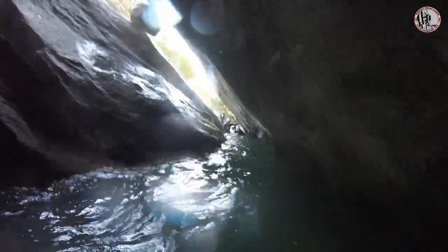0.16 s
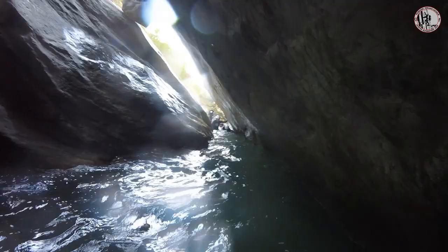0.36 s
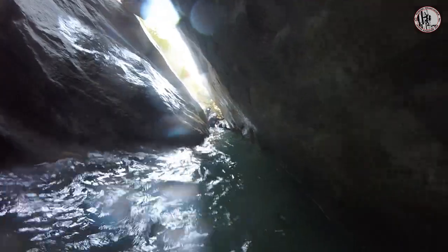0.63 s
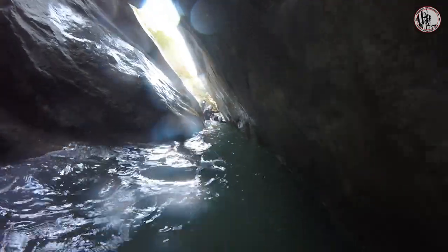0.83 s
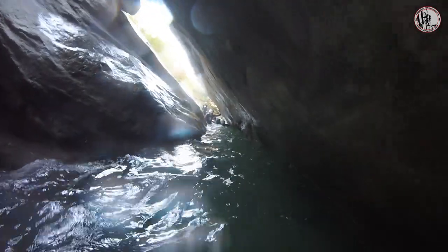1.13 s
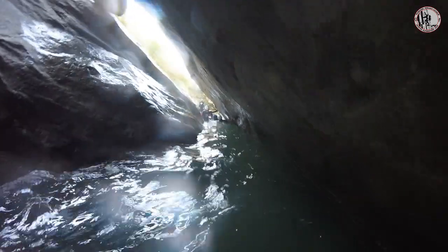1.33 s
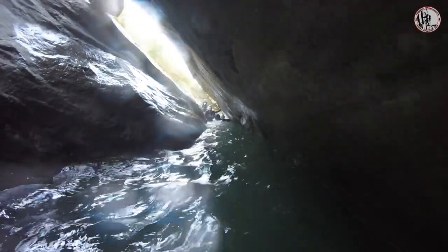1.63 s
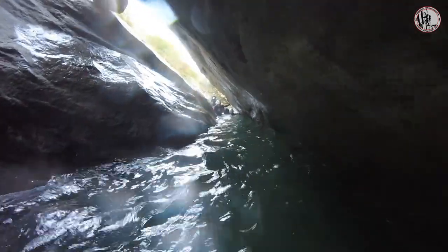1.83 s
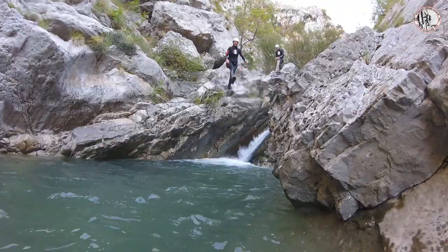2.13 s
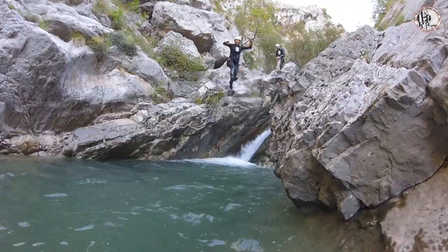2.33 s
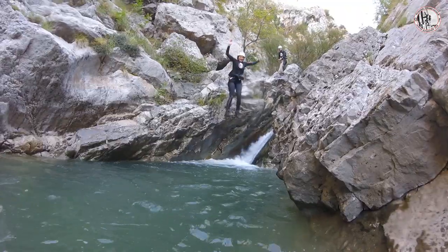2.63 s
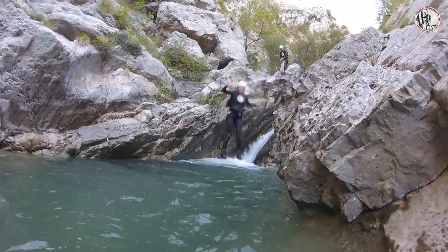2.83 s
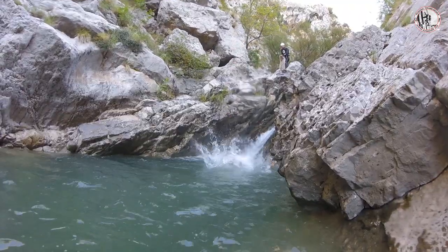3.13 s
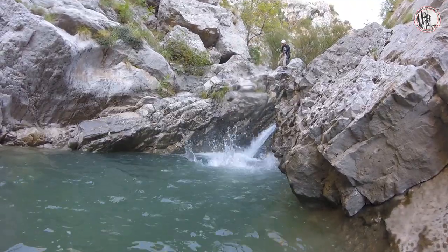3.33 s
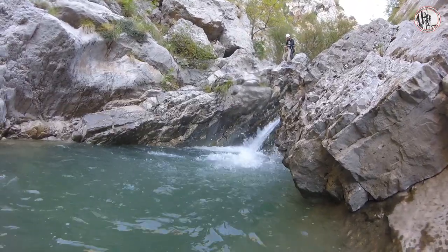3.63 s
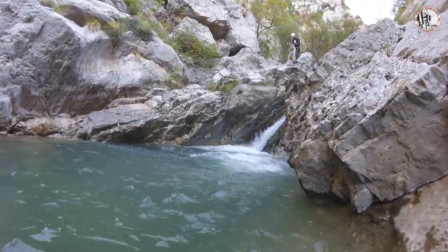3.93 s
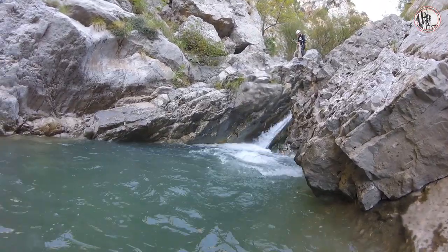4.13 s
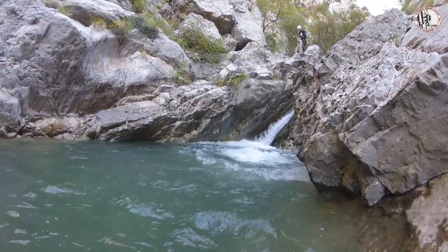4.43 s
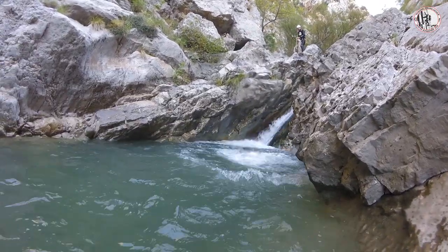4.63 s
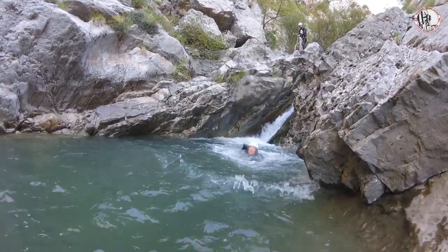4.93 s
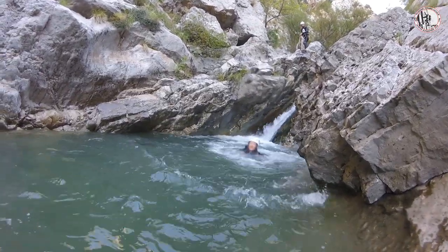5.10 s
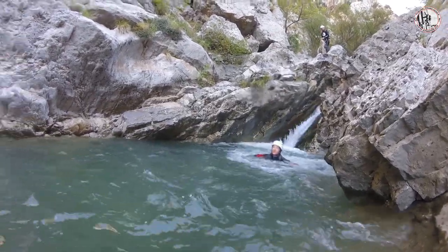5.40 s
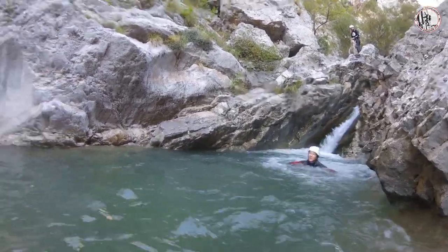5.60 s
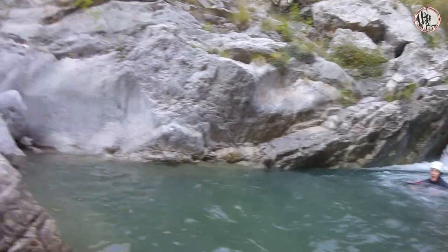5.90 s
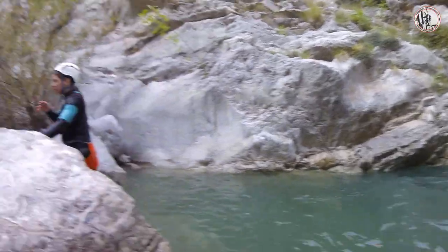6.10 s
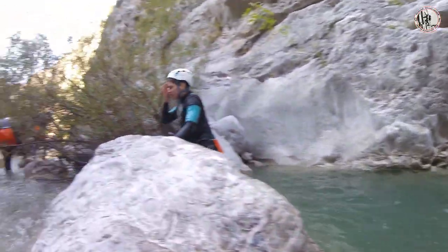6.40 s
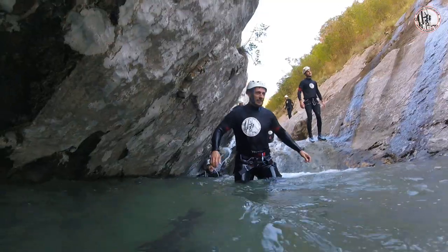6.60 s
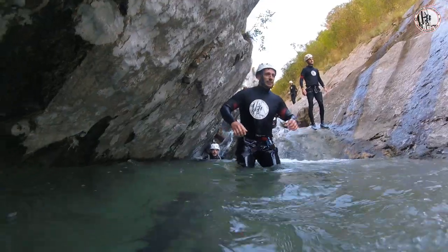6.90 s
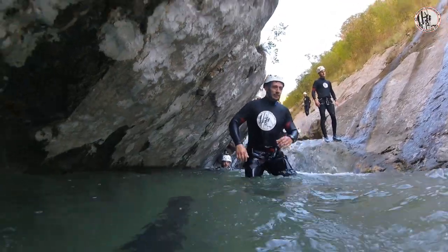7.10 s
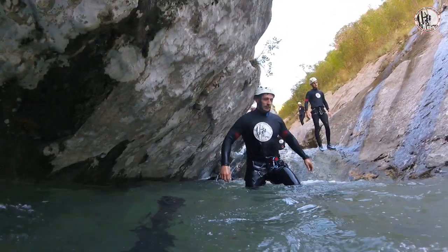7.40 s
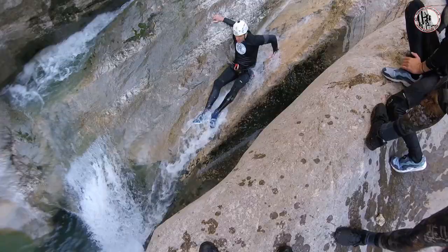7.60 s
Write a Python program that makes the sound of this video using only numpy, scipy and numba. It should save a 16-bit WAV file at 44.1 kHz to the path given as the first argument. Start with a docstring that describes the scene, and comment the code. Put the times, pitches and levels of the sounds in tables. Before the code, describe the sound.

A cascade roars in a narrow cave, bright hiss over a surging deep boom. It cuts abruptly to a lighter fall drumming into an open pool, where a body lands with quick slaps and a fading burst of spray. The fall slowly softens and dulls. After a short silence, water runs over shallows with a pitch-shifting hiss. A small wet camera housing colours everything and clicks under drops.

```python
"""Rushing water at three places in a rocky gorge, heard by a small camera in a wet waterproof housing.
A cascade hisses and booms in a narrow cave; a small fall pours into an open pool, where a jumper lands.
After a short silence water runs through shallows while a film on the microphone port shifts its whistle-like hiss.
Falling water is filtered turbulence, droplets and ringing bubbles; slaps throw up decaying bursts of spray.
Drops knock on the housing as short rings with a tick, and the gain ducks ahead of the loudest hits."""
import sys
import numpy as np
from scipy import signal
from scipy.fft import rfft, irfft, next_fast_len
from scipy.io import wavfile
from scipy.ndimage import uniform_filter1d, minimum_filter1d
from numba import njit

SR = 44100
rng = np.random.default_rng(int(sys.argv[2]) if len(sys.argv) > 2 else 0)


def unload_audio(sound):
    """Save the sound as a 16-bit wav file, at the path given as the first command line argument."""
    columns = np.transpose(np.atleast_2d(sound))
    # keep every value between -1 and 1, then stretch to whole-number steps
    steps = np.round(np.clip(columns, -1, 1) * 32767)
    wavfile.write(sys.argv[1], SR, steps.astype(np.int16))


N = 341762
T = np.arange(N) / SR  # time in seconds
CAVE_END_S, POOL_END_S, SHALLOWS_START_S = 2.089, 6.626, 6.868


# Relative spectrum of the cascade's hiss: pitch_hz, level_db
CAVE_RUSH_SPECTRUM = [(100, -6), (250, 5.5), (500, 3.5), (850, 2.5), (1400, 0), (2500, -1.5), (4000, -2),
                      (5300, 1), (6500, -4.5), (9500, -4)]
# Relative spectrum of the boom under it: pitch_hz, level_db
CAVE_BOOM_SPECTRUM = [(6, -30.5), (22, 0), (38, -2.5), (60, 2), (90, -1.5), (130, -5.5), (170, -11),
                      (260, -13), (400, -22), (900, -46)]
# Level of the hiss in the cave: time_s, level_db
CAVE_HISS_LEVEL = [(0, -21.5), (.8, -20), (1.4, -20.5), (1.66, -23.5), (1.93, -21.5), (2.089, -22.5)]
# Heaviest surges of the boom: peak_s, rise_db
BOOM_SURGES = [(.16, 3), (.38, 3), (.63, 5.5), (1.12, 4.5), (1.4, 6), (1.54, 6.5), (1.66, 6.5)]
BOOM_DB, SURGE_S = -21, 0.048  # level between surges; half-width of a surge


def cave():
    """The cascade fills a narrow cave with hiss and a heavy, churning boom."""
    hiss = rush(CAVE_RUSH_SPECTRUM, spray_db=-7, bubble_db=-19.0, flicker_db=0.9, surge_db=0.08)
    hiss = housed(hiss)
    hiss_db, = curves(CAVE_HISS_LEVEL)
    boom = housed(colour(churn(flicker_db=1, surge_db=1, rate=30), CAVE_BOOM_SPECTRUM))
    boom_db = BOOM_DB + sum(rise_db * swell(peak_s, SURGE_S) for peak_s, rise_db in BOOM_SURGES)
    return undb(hiss_db) * hiss + undb(boom_db) * boom


# Relative spectrum of the fall's hiss: pitch_hz, level_db
POOL_RUSH_SPECTRUM = [(100, 1.5), (330, 0.5), (490, 5), (600, 8), (860, 7), (1150, 3.5), (2000, 0),
                      (3200, -3), (6500, 1), (9500, 0.5)]
# Relative spectrum of the drumming plunge: pitch_hz, level_db
POOL_PLUNGE_SPECTRUM = [(8, -32), (25, -12), (60, -3.5), (95, -6.5), (135, 3.5), (185, -3.5), (250, -1.5),
                        (340, -10.5), (420, -6.5), (490, -15), (1000, -33)]
FALL_DB, PLUNGE_DB = -26, -30  # levels at first
# the treble's sink comes on top of the fall's
FALL_SINK_DB_PER_S, TREBLE_SINK_DB_PER_S, PLUNGE_SINK_DB_PER_S = 0.86, 0.73, 0.94
# the air that the jumper drags under wells up and swells the plunge
WELLING_AT_S, WELLING_S, WELLING_DB = 3.354, 0.14, 5


def pool():
    """A small fall hisses into the pool and drums in the hollow under the rock, growing softer and duller."""
    age_s = np.maximum(T - CAVE_END_S, 0)
    hiss = housed(rush(POOL_RUSH_SPECTRUM, spray_db=-6.5, bubble_db=-18.5, flicker_db=1.5, surge_db=1.5))
    treble = signal.sosfiltfilt(signal.butter(2, 4600, "high", fs=SR, output="sos"), hiss)
    hiss = hiss - treble + treble * undb(-TREBLE_SINK_DB_PER_S * age_s)
    hiss_db = FALL_DB - FALL_SINK_DB_PER_S * age_s
    plunge = housed(colour(churn(flicker_db=2.0, surge_db=0.5, rate=16), POOL_PLUNGE_SPECTRUM))
    plunge_db = PLUNGE_DB - PLUNGE_SINK_DB_PER_S * age_s
    plunge_db = plunge_db + WELLING_DB * swell(WELLING_AT_S, WELLING_S)
    return undb(hiss_db) * hiss + undb(plunge_db) * plunge


# Slaps of the jumper's body and of the closing water, levels before colouring: start_s, level_db, decay_s
SPLASH_SLAPS = [(3.109, -7.5, 0.017), (3.117, -21.5, 0.39), (3.2559, -5, 0.0039), (3.268, -9, 0.022),
                (3.273, 1.5, 0.0011)]
# Colour of the thrown spray: pitch_hz, gain_db
SPLASH_COLOUR = [(100, -5.5), (250, -0.5), (450, 7.5), (800, 2), (1700, 1.5), (3000, -5), (6500, -1.5),
                 (9500, -7)]


def splash():
    """Each slap throws up a burst of spray that thins out exponentially."""
    thrown = np.zeros(N)
    for start_s, level_db, decay_s in SPLASH_SLAPS:
        fading = np.exp(-np.maximum(T - start_s, 0) / decay_s)
        thrown += undb(level_db) * (T >= start_s) * fading
    drops = unit(rng.standard_normal(N) + undb(-5.0) * spray(rate=4000, spread_db=1.0))
    return colour(colour(thrown * drops, SPLASH_COLOUR), HOUSING_RESPONSE)


# Relative spectrum of the water over rock: pitch_hz, level_db
SHALLOWS_SPECTRUM = [(20, -9), (70, -4), (120, -2), (190, -2), (290, 0), (450, -5.5), (900, -10),
                     (1500, -12), (2300, -17.5), (3300, -21), (4200, -28), (6000, -42), (10000, -67)]
# Relative spectrum of the open hiss: pitch_hz, level_db
OPEN_HISS_SPECTRUM = [(5000, -30), (5900, -18), (6500, 5), (7300, -3), (9000, -11), (10300, -14),
                      (11500, -43)]
# Resonance of the water film on the port, lower as the film thickens: time_s, pitch_hz
FILM_RESONANCE = [(6.96, 6580), (7.04, 5460), (7.25, 4700), (7.4, 5070), (7.49, 6230), (7.72, 5900),
                  (7.727, 6400)]
BARE_PORT_HZ, DRAIN_S = 6600, 0.52  # resonance with no film; time constant of the draining port
# each layer: level through a drained port, change when soaked, change per octave that the film sinks
WATER_DB, WATER_SOAKED_DB = -33, -7
FILM_DB, FILM_SOAKED_DB, FILM_DB_PER_OCTAVE = -28, -23.5, -29.5
OPEN_DB, OPEN_SOAKED_DB, OPEN_DB_PER_OCTAVE = -52.5, -28.5, 33.5
# the port is covered at first
UNCOVERED_S, COVERED_WATER_DB, COVERED_TREBLE_DB = 6.901, -7, -8
# at the end a cut to another scene brings a sudden louder hiss
NEXT_SCENE_S, NEXT_FILM_DB, NEXT_OPEN_DB = 7.724, 13, 10
FILM_HOLLOW_WAVER_HZ, FILM_HOLLOW_WAVERS_PER_S = 190, 45  # random trembling of the narrow hollow


def shallows():
    """Water runs over rock; a film on the port dulls it and rings at a pitch that sinks as the film thickens."""
    film_hz, = curves(FILM_RESONANCE)
    age_s = np.maximum(T - SHALLOWS_START_S, 0)
    soaked = np.exp(-age_s / DRAIN_S)
    octaves = np.log2(BARE_PORT_HZ / film_hz)
    next_scene, covered = T >= NEXT_SCENE_S, T < UNCOVERED_S

    water_db = WATER_DB + WATER_SOAKED_DB * soaked + COVERED_WATER_DB * covered
    film_db = FILM_DB + FILM_SOAKED_DB * soaked + FILM_DB_PER_OCTAVE * octaves + NEXT_FILM_DB * next_scene
    open_db = OPEN_DB + OPEN_SOAKED_DB * soaked + OPEN_DB_PER_OCTAVE * octaves + NEXT_OPEN_DB * next_scene

    water = unit(rush(SHALLOWS_SPECTRUM, spray_db=-8.0, bubble_db=-15.0, flicker_db=1.4, surge_db=1.5))
    film = rng.standard_normal(N)
    for _ in range(2):
        film = resonate(film, film_hz, width=920.0)
    hiss = unit(colour(rng.standard_normal(N), OPEN_HISS_SPECTRUM))

    # the wet port lets the upper middle through only as it drains
    upper = resonate(water, np.full(N, 3600.), width=3200.0)
    water = water - upper * np.exp(-age_s / 0.21)
    treble = undb(film_db) * unit(film) + undb(open_db) * hiss
    heard = undb(water_db) * water + undb(COVERED_TREBLE_DB * covered) * treble

    # a narrow hollow trembles above the film's pitch
    hollow_hz = 1.23 * film_hz + FILM_HOLLOW_WAVER_HZ * walk(FILM_HOLLOW_WAVERS_PER_S)
    return hollow(heard, hollow_hz, width=160.0, spread_hz=80)


# Drops and gulps at the housing; tick_db is the sharpness of contact, relative to the ring,
# and level_db is set before leak and housing: start_s, pitch_hz, level_db, decay_s, tick_db
HOUSING_KNOCKS = [(2.026, 85, 4.5, 0.0033, -45), (3.7857, 573, 16.5, 0.00028, -6),
                  (6.3553, 440, -3, 0.0011, -17), (6.3565, 280, -15, 0.0056, -21.5),
                  (7.066, 131, -17.5, 0.011, -49), (7.607, 1410, -19, 0.0013, -25),
                  (7.634, 2200, -26, 0.0017, -20), (7.6425, 644, -13, 0.0038, -40),
                  (7.707, 320, -19, 0.0018, -9), (7.7072, 2220, -23, 0.0012, -19)]


def knocks(size=4096):
    """A drop or gulp ticks on the housing and rings very briefly; the pressure leaks away at once."""
    out, age_s = np.zeros(N + size), np.arange(size) / SR
    for start_s, pitch_hz, level_db, decay_s, tick_db in HOUSING_KNOCKS:
        ring = np.sin(2 * np.pi * pitch_hz * age_s) * np.exp(-age_s / decay_s)
        tick = undb(tick_db) * np.exp(-age_s / .00008)
        start = int(start_s * SR)
        out[start:start + size] += undb(level_db) * (ring + tick)
    leak = signal.butter(1, 90, "high", fs=SR, output="sos")
    return colour(signal.sosfilt(leak, out[:N]), HOUSING_RESPONSE)


def rush(spectrum, spray_db, bubble_db, flicker_db, surge_db):
    """Moving water: turbulence, droplets and bubbles, coloured by the rocks around."""
    mix = churn(flicker_db, surge_db, rate=24)
    mix = mix + undb(spray_db) * spray(rate=2500, spread_db=2.5)
    mix = mix + undb(bubble_db) * bubbles(low_hz=252.6, high_hz=3580, cycles=13, spread_db=4.5)
    return colour(mix, spectrum)


def churn(flicker_db, surge_db, rate, count=9):
    """White turbulence whose octaves surge together and flicker on their own."""
    size = next_fast_len(N)
    noise = rfft(rng.standard_normal(size))
    hz = np.maximum(np.arange(len(noise)) * SR / size, 1)
    octave = np.clip(np.log2(hz / 40), 0, count - 1)
    out = np.zeros(N)
    for k in range(count):
        overlap = np.maximum(1 - abs(octave - k), 0)  # neighbouring bands crossfade
        band = irfft(noise * overlap, size)[:N]
        out += band * undb(flicker_db * walk(rate))
    return unit(out * undb(surge_db * walk(rate / 2)))


def spray(rate, spread_db):
    """Impacts of countless droplets, rate a second on average, a few much larger than the rest."""
    hits = rng.random(N) < rate / SR
    signs = rng.choice([-1, 1], N)
    sizes = undb(spread_db * np.minimum(rng.exponential(size=N), 5))
    return unit(hits * signs * sizes)


def bubbles(low_hz, high_hz, cycles, spread_db, count=5000):
    """Trapped air pockets ring for some cycles, rising in pitch as they near the surface."""
    out = np.zeros(N)
    for when, width, chance in rng.random((count, 3)):
        hz = low_hz * (high_hz / low_hz) ** width
        start = int(when * N)
        length = min(int(cycles * SR / hz), N - start)
        age = np.arange(length) * hz / (cycles * SR)  # 0 to 1 over the bubble's life
        strength = hz * undb(-spread_db * np.log(max(chance, .01)))
        ring = np.sin(2 * np.pi * cycles * age * (1 + age / 10))
        out[start:start + length] += strength * np.exp(-5 * age) * ring
    return unit(out)


# Response of the housing, with two cavity resonances: pitch_hz, gain_db
HOUSING_RESPONSE = [(3300, -1), (4050, 3), (4600, -1), (5100, -5), (5550, -3), (6020, 0.5), (6450, 15),
                    (6950, 7.5), (7800, 2.5), (8600, 3.5), (9250, 7), (9970, -10.5), (10380, -61.5)]


def housed(x):
    """Sound through the wall of the housing, at rms 1."""
    return unit(colour(x, HOUSING_RESPONSE))


def hollow(x, hz, width, spread_hz):
    """A steep, moving hollow made of five notches side by side."""
    for side in (-2, -1, 0, 1, 2):
        x = x - resonate(x, hz + side * spread_hz, width)
    return x


@njit
def resonate(x, hz, width):
    """Band-pass resonance, width in Hz, whose centre can move every sample."""
    out, band, low = np.empty(len(x)), 0., 0.  # band and low are the filter's two memories
    for i in range(len(x)):
        g = np.tan(np.pi * hz[i] / SR)
        damping = width / hz[i]
        v = (band + g * (x[i] - low)) / (1 + g * (g + damping))
        band = 2 * v - band
        low = low + 2 * g * v
        out[i] = damping * v
    return out


def colour(x, points, size=8192):
    """Causal minimum-phase filter through (Hz, dB) points."""
    hz, db = np.transpose(points)
    f = np.maximum(np.arange(size // 2 + 1) * SR / size, 1)
    gain = undb(np.interp(np.log(f), np.log(hz), db))
    # folding the cepstrum puts all of the response after the impulse
    cepstrum = irfft(np.log(gain))
    cepstrum[1:size // 2] *= 2
    cepstrum[size // 2 + 1:] = 0
    impulse = irfft(np.exp(rfft(cepstrum)))
    return signal.fftconvolve(x, impulse)[:N]


def walk(rate):
    """Random values of spread 1, a new one rate times a second, joined by straight lines."""
    knots = rng.standard_normal(2048)
    return np.interp(T * rate, np.arange(len(knots)), knots)


def swell(at_s, length_s):
    """A smooth rise to 1 and fall around a moment."""
    return np.exp(-((T - at_s) / length_s) ** 2)


def curves(table):
    """The columns of a table after its first, joined by straight lines in time."""
    time_s, *columns = np.transpose(table)
    return [np.interp(T, time_s, column) for column in columns]


def during(start_s, end_s):
    """1 between two times, 0 outside, with edges of a few milliseconds."""
    return uniform_filter1d(((T >= start_s) & (T < end_s)) * 1., size=128)


def undb(db):
    """Decibels to gain."""
    return 10 ** (np.asarray(db) / 20)


def unit(x):
    """Scale to rms 1."""
    return x / np.sqrt(np.mean(x ** 2))


# Centre of a narrow hollow in the treble, before its random waver: time_s, pitch_hz
TREBLE_HOLLOW = [(0, 4540), (.35, 4750), (1.05, 4460), (1.5, 4440), (1.7, 4880), (2.2, 4690), (5.5, 4630),
                 (6.6, 4980)]
HOLLOW_WAVER_HZ, HOLLOW_WAVERS_PER_S = 90, 10


def scene():
    """The three places one after another, the same in both ears."""
    falls = cave() * during(0, CAVE_END_S)
    falls = falls + (pool() + splash()) * during(CAVE_END_S, POOL_END_S)
    hollow_hz = curves(TREBLE_HOLLOW)[0] + HOLLOW_WAVER_HZ * walk(HOLLOW_WAVERS_PER_S)
    mono = hollow(falls + knocks(), hollow_hz, width=400.0, spread_hz=95)
    mono = mono + shallows() * during(SHALLOWS_START_S, N / SR)
    return np.array([mono, mono])


def gain_control(x, ceiling_db, release_db_per_s, size=2300):
    """Gain that drops about size samples ahead of a loud hit and creeps back; deep bass hardly triggers it."""
    sensed = signal.sosfilt(signal.butter(2, 250, "high", fs=SR, output="sos"), x)
    power = uniform_filter1d(sensed ** 2, size=176)
    loud_db = 10 * np.log10(np.maximum(power, 1e-12))
    needed_db = np.minimum(ceiling_db - loud_db, 0)
    ahead_db = minimum_filter1d(needed_db, size, origin=-(size // 2))
    release_db = release_db_per_s * T
    return undb(np.minimum.accumulate(ahead_db - release_db) + release_db)


TOP_HZ = 12000  # upper limit of the sound


def record(dry):
    """The camera rides its gain and cuts the top steeply."""
    held = dry * gain_control(dry[0], ceiling_db=-14.5, release_db_per_s=8.0)
    return signal.sosfilt(signal.ellip(8, .2, 70, TOP_HZ, fs=SR, output="sos"), held)


dry = scene()
out = record(dry)
unload_audio(out)
```